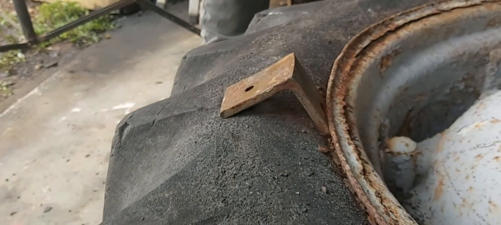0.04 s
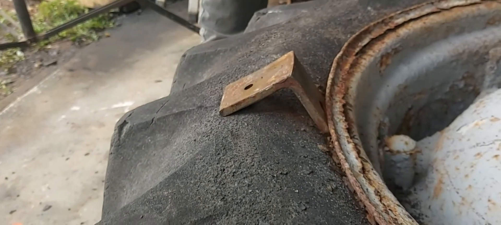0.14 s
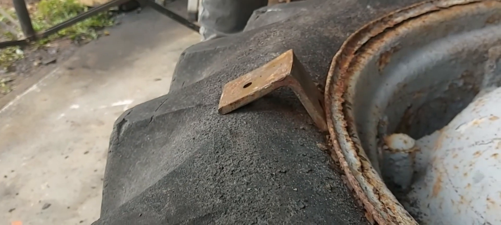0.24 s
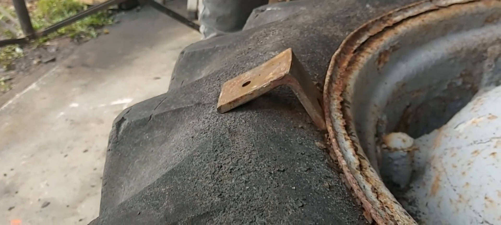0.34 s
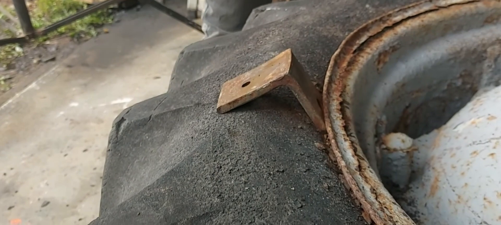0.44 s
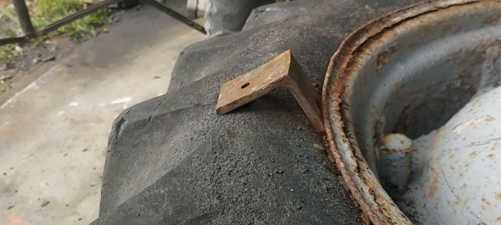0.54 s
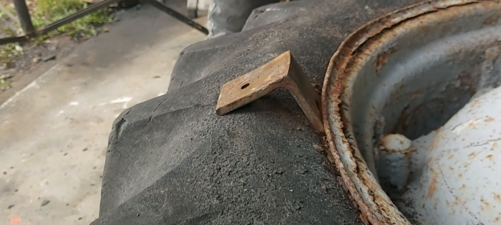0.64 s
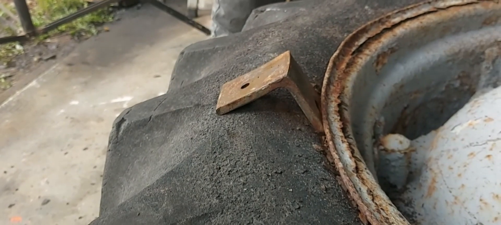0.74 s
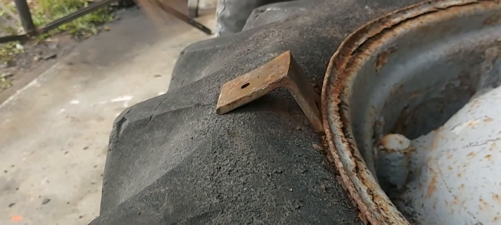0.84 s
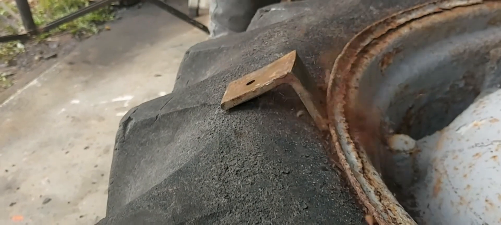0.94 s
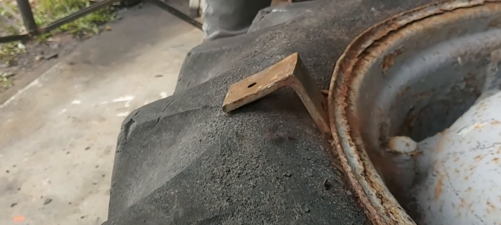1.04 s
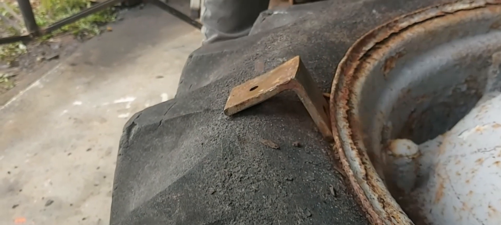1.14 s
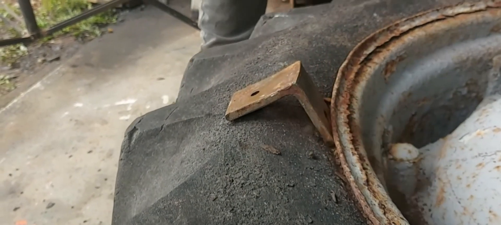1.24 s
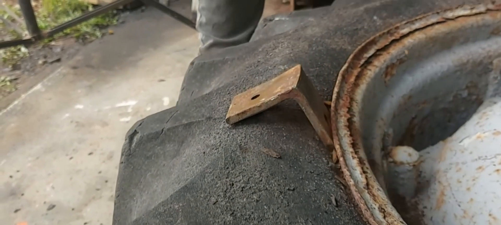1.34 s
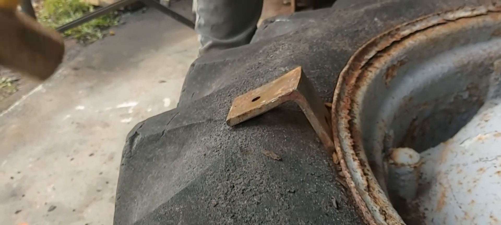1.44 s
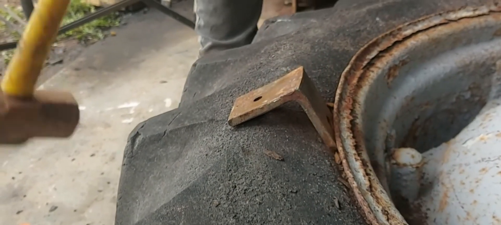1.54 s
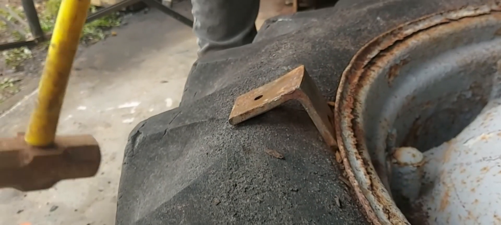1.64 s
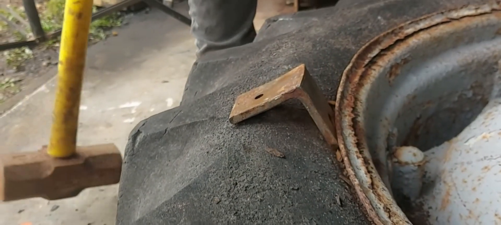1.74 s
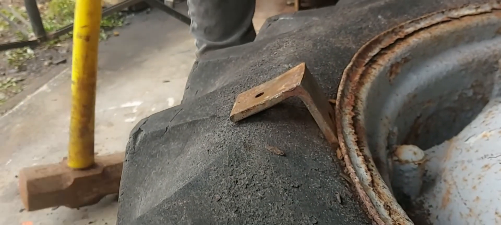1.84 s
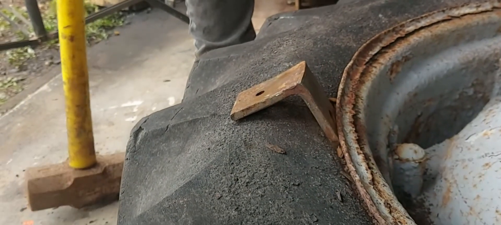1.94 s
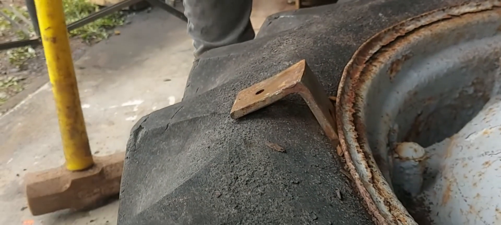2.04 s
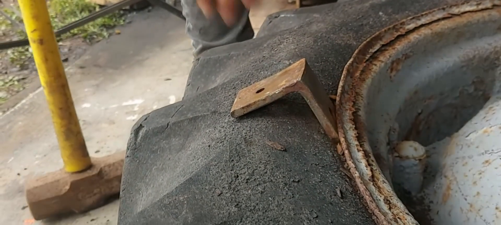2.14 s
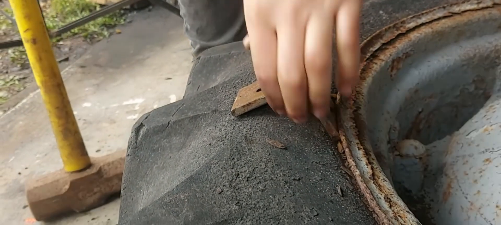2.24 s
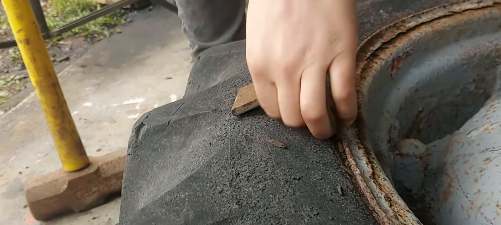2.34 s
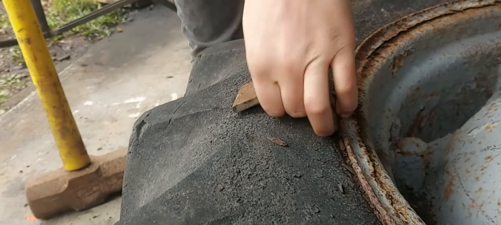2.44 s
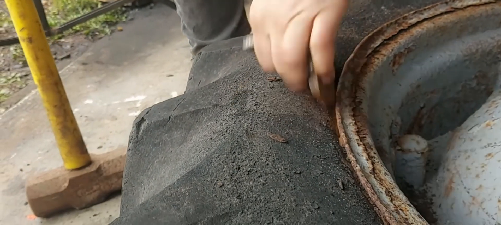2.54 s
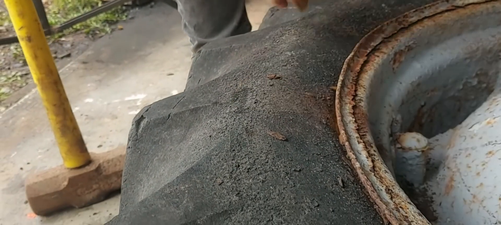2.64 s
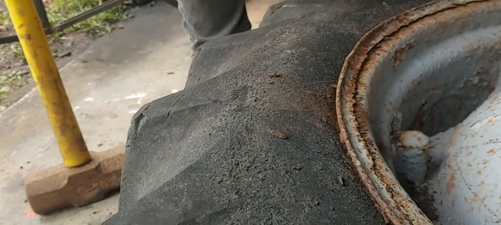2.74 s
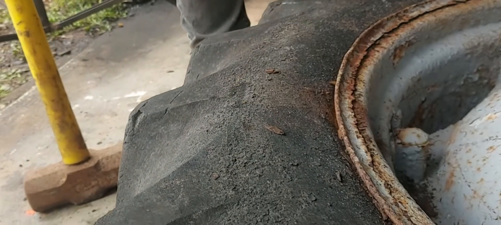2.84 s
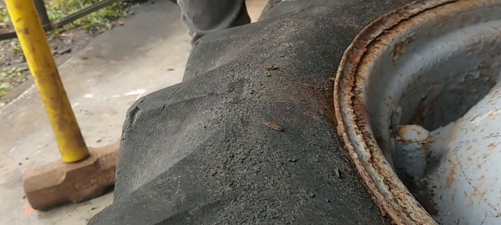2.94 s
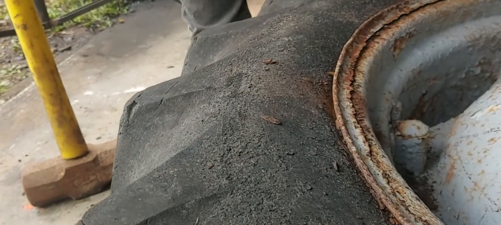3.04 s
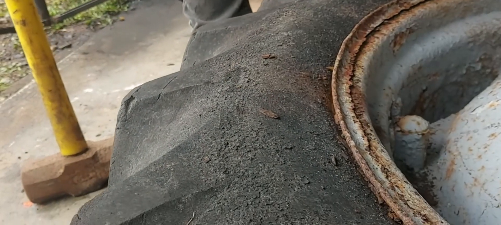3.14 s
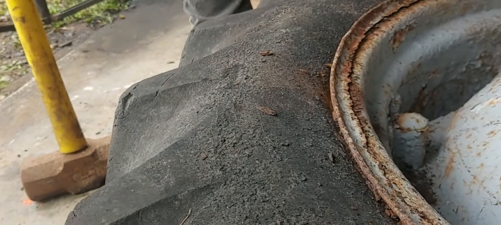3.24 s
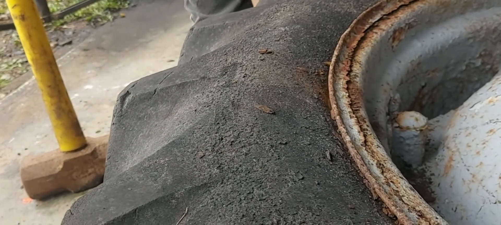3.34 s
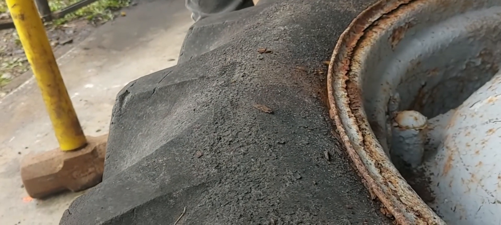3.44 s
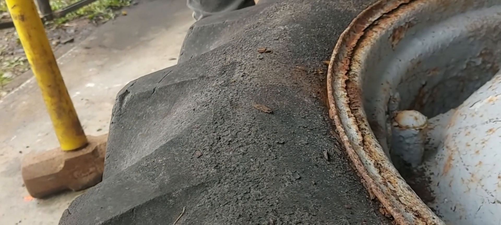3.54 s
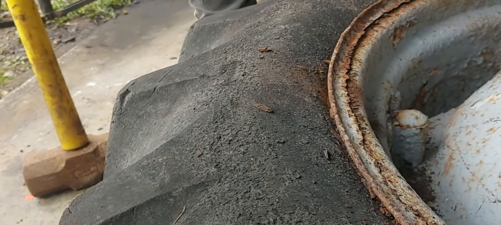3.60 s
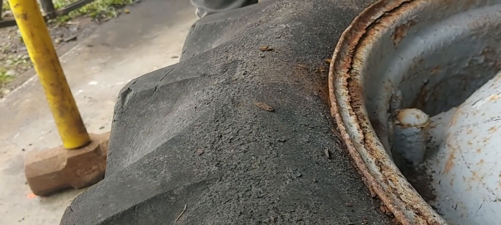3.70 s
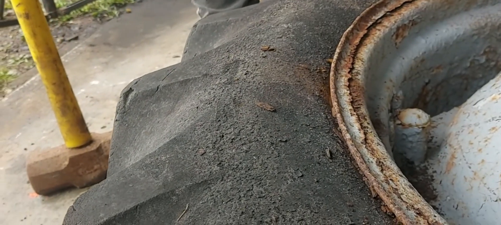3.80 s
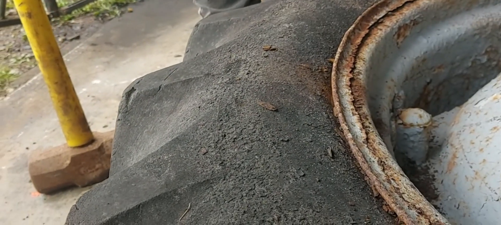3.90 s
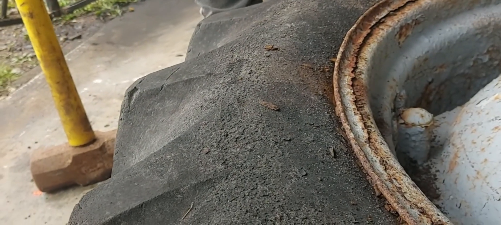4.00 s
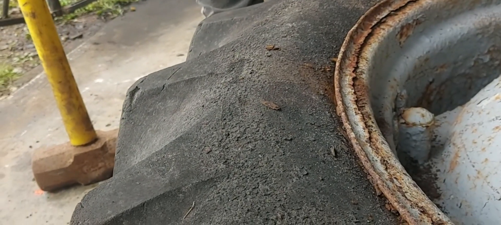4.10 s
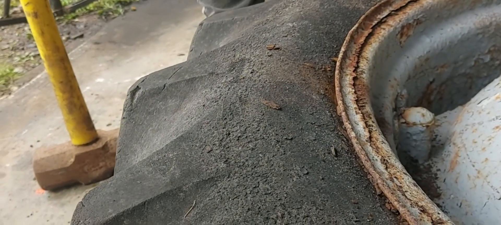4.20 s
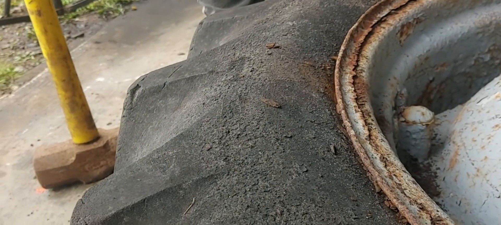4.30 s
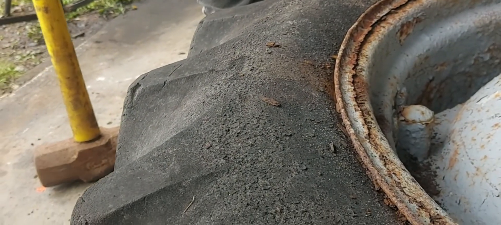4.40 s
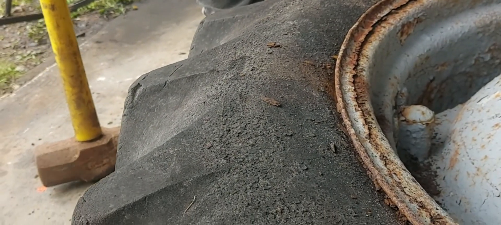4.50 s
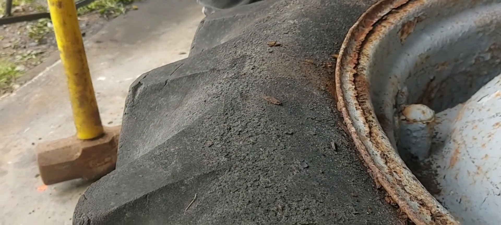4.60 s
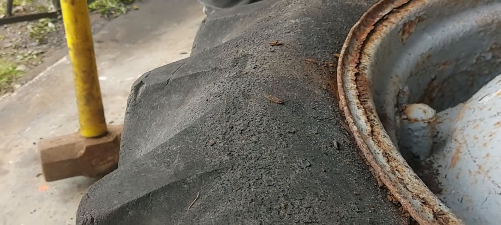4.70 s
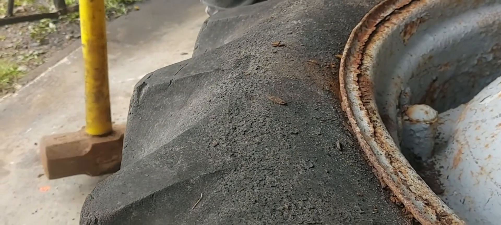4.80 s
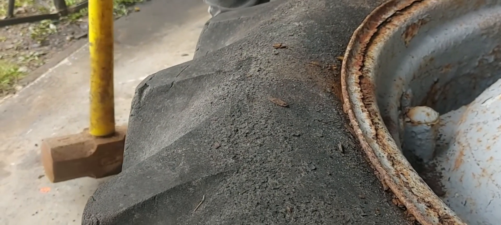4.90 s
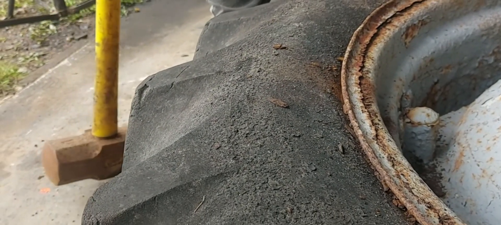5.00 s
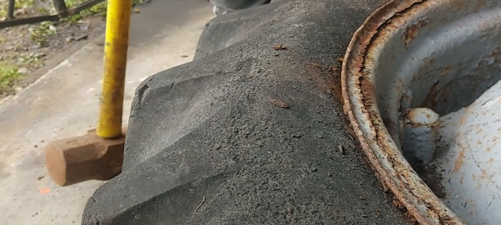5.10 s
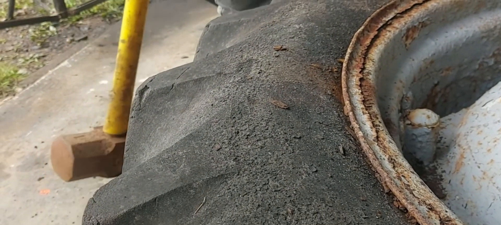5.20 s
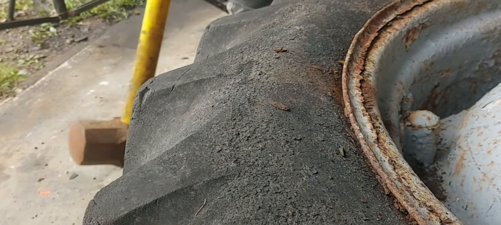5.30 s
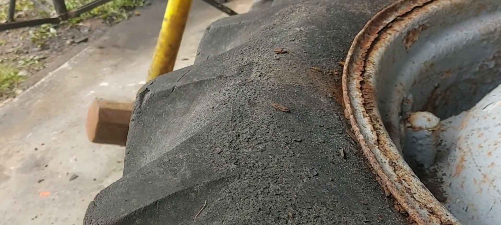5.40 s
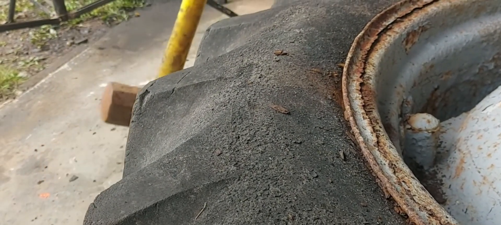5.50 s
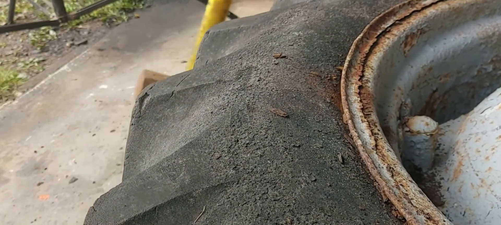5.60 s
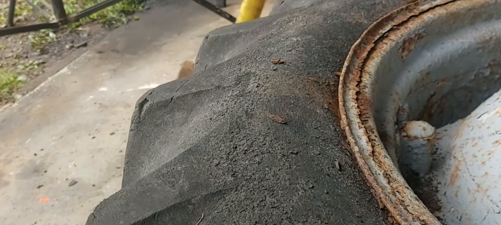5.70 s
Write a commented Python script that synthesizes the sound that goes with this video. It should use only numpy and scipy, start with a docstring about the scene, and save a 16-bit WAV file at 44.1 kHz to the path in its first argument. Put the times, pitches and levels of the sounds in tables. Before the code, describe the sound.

It opens on the decaying clang and low shudder of an earlier hammer blow, with tiny ticks of rust. At 0.9 s a sledge hits the steel wedge: a violent crack, close to overload, then dense bright ringing that fades within about half a second over low rumble. Flakes tick and cloth rustles. Around 1.9-2.2 s the hammer bumps the hollow tyre with dull knocks. At 2.4-2.6 s a hand takes the wedge, with gritty scuffs, a sharp clink and brief metallic singing. A faint narrow hiss comes at 2.8-3.7 s. Hollow booms fall at 3.3-3.4 s, then a bright steel clank and thud near 3.75-3.8 s. Light contacts and rubs follow at 4.2-4.7 s; the hammer head scrapes softly at 4.6-5.4 s. Thumps cluster at 5.4 s, and from 5.63 s heavy bumps and a loud, rough steel grind end it abruptly. Close, dry, short wall reflections.

```python
"""A hammer blow dies away; then a sledge strikes a steel wedge jammed between a big tyre and its rim.
The blow is a push of air, a crack and ringing steel. Bumps on the hollow tyre boom and knock, and
contacts puff and sing; these ring on off hard walls. The loose wedge is jolted in a hand.
Flakes and steel contacts tick, hands and cloth scuff as fluttering noise, steel drags and grinds.
Low rumble, a narrow hiss that comes and goes and quiet air lie underneath."""
import sys
import numpy as np
from scipy import signal
from scipy.fft import rfft, irfft, next_fast_len
from scipy.io import wavfile
from scipy.ndimage import uniform_filter1d, map_coordinates

SR = 44100
rng = np.random.default_rng(int(sys.argv[2]) if len(sys.argv) > 2 else 0)


def to_wav(sig):
    """Store sig (one row per channel, or 1-D mono) as 16-bit WAV at the path in sys.argv[1].

    Samples outside -1..1 are clipped; the rate is SR.
    """
    pcm = np.clip(np.atleast_2d(sig), -1, 1) * 32767
    pcm = np.round(pcm).astype(np.int16)
    wavfile.write(sys.argv[1], SR, pcm.T)  # frames by channels


N = 253564

# Spectra below: each row is frequency in Hz, relative density in dB per Hz.
# Levels are relative within their layer.

# Heavy wheel shuddering after hammer blows, and slow low swells.
# Each row: start in seconds, level in dB, t60 in seconds.
SHUDDERS = [(-.16, -47.5, 2.26), (.926, -31, .25), (1.0, -52, 4.3), (1.599, -62.5, 2), (2.4, -64, 2.5),
            (4.42, -60, 1.2), (4.66, -63.5, 1.2), (4.86, -68.5, 1.9), (5.3, -66, 2)]
SHUDDER_RISE_S, RUMBLE_BED_DB = .015, -75
THUD_SHUDDER_DB, THUD_SHUDDER_T60_S = -30, 1.1  # level over the louder part of each bump
# Spectrum of the rumble.
RUMBLE_SPECTRUM = [(12, -41.5), (20, -17), (86, 6.5), (143, -0.5), (232, -8.5), (266, -13), (415, -13),
                   (565, -33), (1200, -27.5), (1560, -54), (2640, -120)]
# Narrow hiss, heard twice. Each row of a span: time in seconds, level in dB.
HISS_SPANS = [
    [(0.58, -106), (0.656, -80.5), (0.9, -76)],
    [(2.75, -80.5), (2.9, -70.5), (3.2, -69.5), (3.74, -70.5)],
]
# Spectrum of each hiss.
HISS_SPECTRA = [
    [(3250, -25.5), (3500, -1.5), (3700, 1), (3950, -27)],
    [(3000, -24), (3300, -3), (3950, 1), (4250, -28)],
]
HISS_FLARE_DB = -9  # the second hiss flares with the rustles
# Quiet air and microphone: spectrum.
AIR_SPECTRUM = [(290, -31.5), (500, 2), (686, -1), (915, -3.5), (1800, -7), (2430, -10.5), (6950, -15),
                (9670, -17), (12200, -12.5), (15500, -14.5)]
# Air level. Each row: time in seconds, level in dB.
AIR_LEVEL = [(0, -85), (.85, -85), (1.3, -79.5), (5.75, -80.5)]
# Diffuse sound. Each row: frequency in Hz, left-right likeness from 0 to 1.
LIKENESS = [(60, .82), (250, .65), (1000, .5), (4000, .2), (12000, .2)]
# Decay of the walls' answer. Each row: frequency in Hz, t60 in seconds.
WALL_T60 = [(80, 0.28), (300, 0.51), (1000, 0.12), (4000, 0.11), (14000, 0.18)]

# Hands, cloth and steel brushing; rise and fall span 20 dB. Each row: peak time in seconds,
# rise in seconds, fall in seconds, rub in dB, coarse part over the rub in dB, rustle in dB.
STROKES = [(.07, .3, .25, -94, 0, -69.5), (.33, .04, .04, -92, 0, -78),
           (.392, 0.014, 0.036, -74.5, 6, -77.5), (.81, .03, 0.0987, -85, 8.5, -100),
           (1.22, .4, 0.13, -85.5, -10.5, -67.5), (1.39, .1, 0.097, -75.5, -1.5, -75),
           (1.63, 0.152, 0.087, -65, -9, -62.5), (1.77, 0.064, 0.096, -81, 5.5, -87),
           (1.92, .1, 0.19, -66, 2.5, -66.5), (2.15, .4, 0.18, -78, -5.5, -74),
           (2.39, 0.055, .03, -67, 3.5, -74.5), (2.44, .02, 0.038, -67, 0, -80),
           (2.549, 0.027, 0.058, -55, -5, -58.5), (2.612, 0.035, .04, -51.5, 4, -58.5),
           (2.64, 0.073, .13, -60.5, 2, -71), (2.9, 0.075, .05, -74.5, 9.5, -71.5),
           (3.0, 0.044, 0.065, -70.5, 8.5, -59), (3.095, 0.04, .075, -72, 9, -57.5),
           (3.15, .1, 0.093, -75.5, 8.5, -78.5), (3.41, .12, .08, -73, 2, -77.5),
           (3.68, 0.157, 0.11, -84.5, 11.5, -86), (3.755, .03, 0.075, -60, 3.5, -60),
           (3.93, 0.114, 0.099, -75.5, 6.5, -80), (4.2, 0.61, 0.77, -81.5, 8.5, -88.5),
           (4.436, 0.024, 0.021, -62, 3, -73.5), (4.478, .02, 0.036, -55, -3, -64),
           (4.711, 0.123, 0.18, -74, 3.5, -76), (4.87, 0.055, 0.14, -76.5, 10.5, -81),
           (5.016, .05, .06, -75, 7, -71.5), (5.25, .5, 0.88, -84, 15, -92),
           (5.439, 0.044, .14, -70.5, 14, -74)]
STROKE_ROUND = 1.6  # exponent: 1 = pointed peak, 2 = bell
# Fine rub: spectrum.
RUB_SPECTRUM = [(2500, -20), (4000, -1), (8000, -1), (10000, -13.5), (12000, -22)]
# Dust and rustle: spectrum.
RUSTLE_SPECTRUM = [(9000, -28), (11500, -5), (12500, 0.5), (15500, -10)]
# Coarse rub: spectrum.
SCRAPE_SPECTRUM = [(450, -6.5), (900, -6), (1700, -2), (2900, -6), (5000, -23)]
# Narrow scraping tone, longest as the hammer head slides on the ground.
# Each row of a span: time in seconds, level in dB.
DRAG_SPANS = [
    [(2.13, -84), (2.2, -76), (2.27, -84)],
    [(2.86, -82), (2.92, -70), (3.2, -78.5)],
    [(4.6, -82), (4.8, -72), (5.012, -65), (5.13, -73), (5.37, -67), (5.4, -79.5)],
]
# Scraping tone: spectrum.
DRAG_SPECTRUM = [(1300, -25), (1500, -4), (1600, -7), (1720, 0), (1900, -25)]
# Hammer head grinding over a steel edge. Each row: time in seconds, level in dB, rustle in dB.
GRIND = [(5.634, -52, -76), (5.643, -40, -70.5), (5.7, -37, -66), (5.735, -38.5, -64.5), (5.75, -42, -50)]
GRIND_RUB_DB = -24  # fine rub over the grind
# The steel edge sings in two bands: spectrum.
GRIND_SPECTRUM = [(600, -16), (1200, -15), (1500, -8), (1780, 0), (2050, -5), (2350, -15), (2900, -2),
                  (3300, -12), (4500, -17), (9000, -30)]

# Short bright ticks: rust, grit and the bright edge of steel contacts.
# Each row: start in seconds, level in dB, lower part over it in dB.
TICKS = [(0.0753, -50.5, -7), (0.1057, -54.5, -4), (0.1248, -55, -1.5), (0.1446, -52.5, -8),
         (0.1804, -54.5, -12), (0.2655, -63.5, -17), (0.3424, -60, -30), (0.39, -57, -22.5),
         (1.1844, -39, -31), (1.442, -40, -24), (1.916, -45.5, -21), (2.355, -61.5, -5.5),
         (2.383, -60.5, -5), (2.5452, -48, 0.5), (2.614, -40, 5), (2.81, -59, -3), (3.0594, -58.5, -8),
         (3.75, -38, -12), (4.4343, -56.5, -5), (4.4765, -41.5, -11.5), (5.739, -38, -6)]
SHOWER_S = (.25, .65)  # span after each blow in which small flakes fall
SHOWER_DB, SHOWER_LOW_DB = -63, -15  # mean level over the blow's strength; lower part over the tick

# Steel touching steel or stone. Each row: start in seconds, level in dB.
CLINKS = [(0.7997, -60.5), (1.73, -52), (2.3555, -44.5), (2.3842, -45.5), (2.5446, -41.5), (2.6096, -29.5),
          (2.9039, -54), (3.3936, -50), (3.7495, -24), (3.7746, -38.5), (4.4342, -41), (4.4745, -50.5),
          (5.5553, -49.5), (5.6381, -46), (5.738, -29)]
CLINK_T60_S = .057
# Gritty puff of a contact: spectrum.
PUFF_SPECTRUM = [(240, -23), (400, -0.5), (503, -14.5), (809, -6), (1070, -17), (1820, -11.5), (2400, -32),
                 (2800, -22.5), (5570, -22), (15500, -36.5)]
# Modes of the loose wedge. Each row: frequency in Hz, level in dB, t60 in seconds.
WEDGE_MODES = [(2175, 0, .3), (5367, -3, .2), (6804, -9, .15)]
# Jolts of the wedge in the hand. Each row: start in seconds, level in dB, upper-mode gain in dB.
TAPS = [(2.615, -46, -4), (2.71, -60, -20), (3.33, -72, -20), (3.40, -68, 9), (3.437, -58, -14),
        (3.75, -62, 12)]
GRIP_S = .085  # fingers close on the wedge and stop its ring
# Small bright knock: start in seconds, then modes of frequency in Hz, level in dB, t60 in seconds.
PING = (.803, [(1130, -65, .08), (4600, -78, .06)])

# Bumps on the tyre. Each row: start in seconds, knock in dB, boom in dB, boom pitch in Hz,
# knock t60 in seconds.
THUDS = [(1.909, -22, -41, 286, 0.06), (1.937, -32.5, -39.5, 80.3, 0.2), (1.995, -32, -32, 271.5, .095),
         (2.022, -44, -35.5, 215, .26), (2.184, -58, -46.5, 131.6, 0.073), (2.611, -39.5, -32, 138, 0.12),
         (3.309, -35, -29, 122.2, 0.052), (3.396, -31.5, -21.5, 133.7, 0.043),
         (3.428, -42, -40.5, 134.4, 0.087), (3.49, -65.5, -51, 117, .05), (3.756, -42, -38, 135, 0.045),
         (3.812, -23, -23, 129.2, 0.078), (4.243, -49, -36, 112.3, .051),
         (4.457, -50.5, -35.5, 124.5, 0.048), (4.686, -58, -56, 103.6, 0.057),
         (5.422, -29, -30, 246.4, 0.058), (5.432, -27.5, -22, 200, .059), (5.45, -41, -33, 102.6, 0.057),
         (5.459, -34, -38, 183, .08), (5.636, -34.5, -35.5, 279, 0.088), (5.69, -30, -17, 140, .11),
         (5.736, -25.5, -29.5, 225, 0.032)]
# Tyre wall resonances. Each row: frequency in Hz, width in Hz, level in dB.
CASING = [(231.5, 89, -1.5), (417, 86, 1), (594, 121, -2), (808, 172, -6.5), (1270, 510, -16.5)]
RUBBER_HZ = 1070  # soft contact passes little above this
BOOM_CYCLES, KNOCK_PAN_DB = 3.83, -4.5  # pan is left minus right

# Hammer on wedge; the first is heard only dying away. Each row: start in seconds, strength in dB.
BLOWS = [(-.16, -5.5), (.926, 0.5)]
# First instant of the blow: spectrum.
CRACK_SPECTRUM = [(300, -10.5), (1500, 1.5), (8000, -3), (12500, -4.5), (14500, -25)]
# Wedge and rim under the hammer. Each row: frequency in Hz, level in dB, t60 in seconds.
RIM_MODES = [(60, -1, .3), (103, -4, .6), (137, -4, .6), (242, -2, .5), (300, -5, .45), (390, 1, .5),
             (496, -4, .45), (618, -8, .35), (846, -13, .3), (1561, -13, .25), (1918, -12, .4),
             (1992, -11, .45), (2067, -13, .4), (2217, -14, .4), (2580, -13, .33), (2869, -14, .34),
             (3876, -17, .38), (4355, -15, .2), (4872, -14, .28), (5970, -13, .2), (6451, -14, .3),
             (6993, -11, .25), (7082, -12, .25), (7488, -13, .38), (7643, -1, .25), (11177, -15, .25),
             (12305, -17, .17)]
# Dense clatter of the steel: spectrum.
CLANG_SPECTRUM = [(24, -50), (40, -20), (241, -6), (333, -7), (397, -5), (1160, -19.5), (1530, -16),
                  (2580, -18), (3390, -18), (4930, -21), (5450, -23), (7540, -12.5), (8540, -29.5),
                  (12100, -18.5), (15500, -47)]
# Decay of the clatter. Each row: frequency in Hz, t60 in seconds.
CLANG_T60 = [(60, 0.79), (250, 0.54), (900, .35), (2000, 0.5), (7500, 0.38), (9500, 0.33), (14000, 0.32)]
# The blow at the two ports. Each row: frequency in Hz, left minus right in dB.
LEAN = [(60, -3), (110, -1), (200, 1.5), (380, -1), (700, 0.5), (1290, 1), (2380, -1), (4400, -1.5),
        (8120, -7), (15000, -1)]

LOW_HZ, TOP_HZ = 28, 15700  # microphone low corner, recorder band limit


def amp(db):
    """dB to gain."""
    return 10 ** (np.asarray(db) / 20)


def unit(x):
    """x at rms 1."""
    return x / np.sqrt(np.mean(x ** 2) + 1e-20)


def along(points, hz):
    """(Hz, value) points read on a log axis."""
    f, v = np.transpose(points)
    return np.interp(np.log(hz + 1), np.log(f + 1), v)


def curve(spans, axis):
    """One table column per sample; outside a span column 1 is -140 dB, others 0 dB."""
    t = np.arange(N) / SR
    out = np.full(N, -140. * (axis == 1))
    for rows in map(np.array, spans):
        inside = (t >= rows[0, 0]) & (t <= rows[-1, 0] + .024)  # last value holds briefly
        out[inside] = np.interp(t[inside], rows[:, 0], rows[:, axis])
    return out


def sparse(shape):
    """A slow function of time, computed every millisecond and joined up."""
    t = np.arange(0, N / SR + .001, .001)
    return np.array([np.interp(np.arange(N) / SR, t, row) for row in np.atleast_2d(shape(t))])


def wobble(rate_hz):
    """A smooth random curve, rate_hz knots a second."""
    knots = rng.standard_normal(int(N * rate_hz / SR) + 4)
    return map_coordinates(knots, [np.arange(N) * rate_hz / SR])


def filtered(x, response):
    """x times a complex response of frequency."""
    m = next_fast_len(x.shape[-1] + 8192)
    spectrum = rfft(x, m) * response(np.fft.rfftfreq(m, 1 / SR))
    return irfft(spectrum, m)[..., :x.shape[-1]]


def noise(spectrum, size=N):
    """Stereo noise of rms 1, alike in the bass and unlike in the treble."""
    def shape(hz):
        turn = np.arccos(np.clip(along(LIKENESS, hz), 0, 1)) / 2
        return amp(along(spectrum, hz)) * [np.cos(turn), np.sin(turn)]

    mid, side = filtered(rng.standard_normal((2, size)), shape)
    return unit(np.array([mid + side, mid - side]))


def dying(x, t60s):
    """Each frequency of x fades at its own speed."""
    hz, t, z = signal.stft(x, SR, nperseg=256)
    fade = amp(-60 * t / along(t60s, hz)[:, None])
    return signal.istft(z * fade, SR, nperseg=256)[1][..., :x.shape[-1]]


def ring(modes, t, scatter_db):
    """Sum of damped sine modes, each level scattered at random by scatter_db."""
    total = 0
    for hz, db, t60_s in modes:
        fade = amp(db + rng.normal(0, scatter_db) - 60 * t / t60_s)
        total = total + fade * np.sin(2 * np.pi * hz * t)
    return total


def add(out, start_s, x, lag_s=0.):
    """Mixes x in at start_s; the left port hears it lag_s later."""
    stereo = np.broadcast_to(x, (2, x.shape[-1]))
    for side, when_s in enumerate((start_s + lag_s, start_s)):
        i = round(when_s * SR)
        part = stereo[side, max(-i, 0):N - i]
        out[side, max(i, 0):max(i, 0) + len(part)] += part


def strokes(t):
    """Gains of rub, coarse rub and rustle: each stroke swells to its peak and fades."""
    power = 0
    for peak_s, rise_s, fall_s, rub_db, coarse_db, rustle_db in STROKES:
        distance = np.where(t < peak_s, (peak_s - t) / rise_s, (t - peak_s) / fall_s)
        shape = amp(-40 * distance ** STROKE_ROUND)  # power: -20 dB at distance 1
        power = power + amp([[rub_db], [rub_db + coarse_db], [rustle_db]]) ** 2 * shape
    return np.sqrt(power)


def shudder(t):
    """Gain of the rumble: a steady bed, raised by each jolt of the wheel."""
    rows = list(SHUDDERS)
    for s, knock_db, boom_db, *_ in THUDS:
        rows.append((s, max(knock_db, boom_db) + THUD_SHUDDER_DB, THUD_SHUDDER_T60_S))
    power = amp(RUMBLE_BED_DB) ** 2
    for s, db, t60_s in rows:
        after_s = np.maximum(t - s, 0)
        rise = 1 - np.exp(-after_s / SHUDDER_RISE_S)
        power = power + amp(db - 60 * after_s / t60_s) ** 2 * rise
    return np.sqrt(power)


def flare(t):
    """Rustle gain within the span of the second hiss."""
    rows = HISS_SPANS[1]
    return strokes(t)[2] * (t > rows[0][0]) * (t < rows[-1][0])


def yard():
    """Low rumble in lumps, a narrow hiss and quiet air, all shaped noise."""
    lumps_db = 3 * wobble(15)
    rumble = sparse(shudder) * amp(lumps_db) * noise(RUMBLE_SPECTRUM)
    first, second = (amp(curve([rows], axis=1) + 2.4 * wobble(22)) for rows in HISS_SPANS)
    second = second + sparse(flare) * amp(HISS_FLARE_DB)
    hiss = first * noise(HISS_SPECTRA[0]) + second * noise(HISS_SPECTRA[1])
    air = amp(curve([AIR_LEVEL], axis=1)) * noise(AIR_SPECTRUM)
    return rumble + hiss + air


def walls(x):
    """Diffuse answer of the walls: a fresh decaying noise tail for each quarter second of sound."""
    out, step = np.zeros((2, N)), SR // 4
    for i in range(0, N, step):
        tail = dying(noise([(20, 0), (16000, 0)], size=SR // 2), WALL_T60)
        tail = tail / np.linalg.norm(tail[0])
        add(out, i / SR + .012, signal.fftconvolve(x[:, i:i + step], tail, axes=1))
    return out


def scuffs():
    """Rubbing surfaces catch unevenly, so their level flutters; dust falls in tiny grains."""
    fine, coarse, rustle = sparse(strokes)
    grind = amp(curve([GRIND], axis=1))
    grinding = np.arange(N) > GRIND[0][0] * SR
    rustle = rustle + amp(curve([GRIND], axis=2)) * grinding
    rub = (fine + amp(GRIND_RUB_DB) * grind) * noise(RUB_SPECTRUM)
    rub = rub + coarse * noise(SCRAPE_SPECTRUM) + grind * noise(GRIND_SPECTRUM)
    rub = amp(2.3 * wobble(60) + 1.5 * wobble(300)) * rub
    dust = rustle * amp(2.2 * wobble(600)) * noise(RUSTLE_SPECTRUM)
    drag_db = curve(DRAG_SPANS, axis=1) + 2.85 * wobble(25) + 3.5 * wobble(8)
    return rub + dust + amp(drag_db) * noise(DRAG_SPECTRUM)


def shower(count):
    """Small flakes at chance moments after each blow."""
    rows = []
    for s, db in BLOWS:
        for _ in range(count):
            rows.append((s + rng.uniform(*SHOWER_S), db + SHOWER_DB + rng.normal(0, 3), SHOWER_LOW_DB))
    return rows


def ticks():
    """Millisecond noise ticks, mostly very high, from flakes and steel contacts."""
    out, t = np.zeros((2, N)), np.arange(SR // 50) / SR
    for s, db, low_db in list(TICKS) + shower(count=5):
        tick = noise(RUSTLE_SPECTRUM, size=len(t)) + amp(low_db) * noise(RUB_SPECTRUM, size=len(t))
        add(out, s, amp(db + 2.5 - 60 * t / 0.011) * tick)
    return out


def clinks():
    """A gritty puff for each contact; the loose wedge sings when jolted."""
    out, t = np.zeros((2, N)), np.arange(SR // 2) / SR
    for s, db in CLINKS:
        puff = noise(PUFF_SPECTRUM, size=len(t)) * (1 - np.exp(-t / 0.0022))
        add(out, s, amp(db - 4.5 - 60 * t / CLINK_T60_S) * puff)
    onset = 1 - np.exp(-t / .003)
    grip = np.exp(-(t / GRIP_S) ** 4)
    for s, db, upper_db in TAPS:
        song = ring(WEDGE_MODES[:1], t, scatter_db=1.5)
        song = song + amp(upper_db) * ring(WEDGE_MODES[1:], t, scatter_db=0)
        add(out, s, amp(db) * song * onset * grip)
    add(out, PING[0], ring(PING[1], t, scatter_db=1) * onset)
    return out


def tyre_wall(f):
    """Soft contact driving the wall: alternating-sign resonances under a rubber low-pass."""
    wall = 0
    for k, (centre, width, db) in enumerate(CASING):
        wall = wall + (-1) ** k * amp(db) * 1j * f * width / (centre ** 2 - f * f + 1j * f * width)
    return wall / (1 + 1j * f / RUBBER_HZ) ** 2


def tyre():
    """The air inside booms for a few cycles; a short rough shove knocks the wall's resonances."""
    out, t = np.zeros((2, N)), np.arange(SR // 2) / SR
    pan = amp(KNOCK_PAN_DB * np.array([[.5], [-.5]]))
    for s, knock_db, boom_db, hz, t60_s in THUDS:
        phase = 2 * np.pi * hz * t
        held = np.exp(-(t * hz / BOOM_CYCLES) ** 2) * (1 - np.exp(-t / 0.0033))  # rubber chokes the boom
        # the dented wall bends the pitch about
        sway = 1.34 * np.sin(2 * np.pi * rng.uniform(15.4, 34.3, (2, 1)) * t)
        upper = 0.28 * np.sin(phase * rng.uniform(1.408, 1.9))  # a weaker, unrelated air mode
        lower = 0.34 * np.sin(phase * 0.6)  # the whole tyre heaves
        boom = -held * (np.sin(phase + 0.12 * sway[0] + 0.44 * sway) + upper + lower)
        shove = amp(-60 * t / t60_s) * rng.standard_normal(len(t))
        shove[:8] -= 1.6  # the first contact pushes the wall inward
        knock = filtered(shove, tyre_wall)
        knock = knock / np.abs(knock).max() * pan
        add(out, s, amp(boom_db) * boom + amp(knock_db + 2.0) * knock, lag_s=.00005)
    return out


def hammer():
    """A sharp inward push of air, then steel modes over a dense clatter that fades band by band."""
    out, t = np.zeros((2, N)), np.arange(SR) / SR
    # countless small modes crowd unevenly
    crowd = unit(uniform_filter1d(rng.standard_normal(SR // 20), size=7))
    crowd_hz = np.linspace(0, SR / 2, len(crowd))

    def ragged(hz):
        return amp(2.5 * np.interp(hz, crowd_hz, crowd))

    for s, db in BLOWS:
        u = (t - .0004) / 0.00012
        push = -amp(-1.0) * (1 - 0.22 * u * u) * np.exp(-u * u / 2)  # a dip, small rebound on each side
        crack = amp(-7.0 - 60 * t / 0.0064) * noise(CRACK_SPECTRUM, size=SR) * (1 - np.exp(-t / .0004))
        clatter = amp(-18.0) * dying(filtered(noise(CLANG_SPECTRUM, size=SR), ragged), CLANG_T60)
        bloom = 1 - np.exp(-t / 0.0077)  # the blow takes a while to spread round the rim
        steel = clatter + amp(-26.0) * bloom * ring(RIM_MODES, t, scatter_db=0)
        swell = 1 - np.exp(-t / 0.0056)
        add(out, s, amp(db) * (push + crack), lag_s=.0001)
        add(out, s, amp(db) * swell * steel, lag_s=0.00044)  # the rim lies nearer the right port
    return filtered(out, lambda hz: amp(along(LEAN, hz) * [[.5], [-.5]]))


def scene():
    """Mixes all layers; bumps and clinks ring on in the yard."""
    bumps, steel = tyre(), clinks()
    echo = walls(amp(-9.5) * bumps + amp(-7.0) * steel)
    return yard() + echo + scuffs() + ticks() + steel + bumps + hammer()


def record(dry):
    """The microphone loses the deepest bass; the recorder clips at full scale and has a band limit."""
    heard = filtered(dry, lambda hz: (1j * hz / (LOW_HZ + 1j * hz)) ** 2)
    return filtered(np.clip(heard, -1, 1), lambda hz: hz < TOP_HZ)


dry = scene()
out = record(dry)
to_wav(out)
```